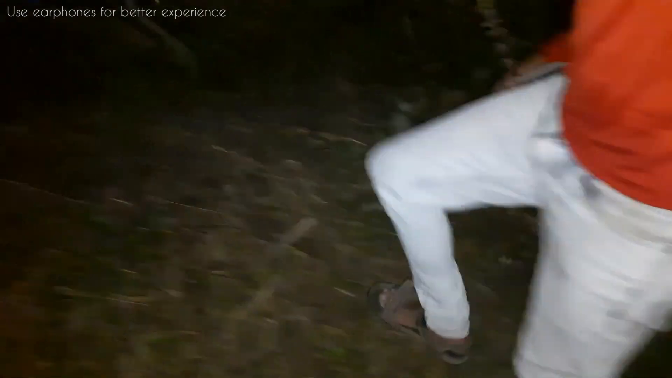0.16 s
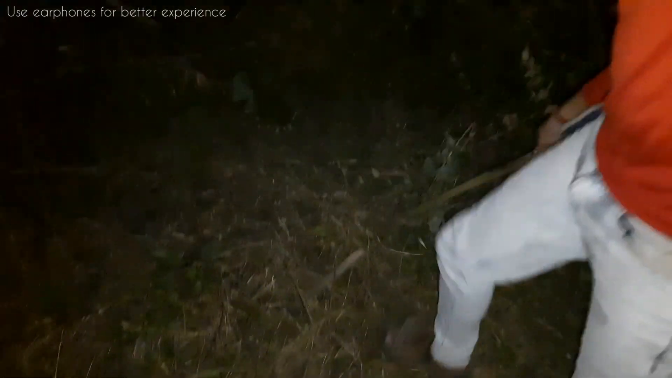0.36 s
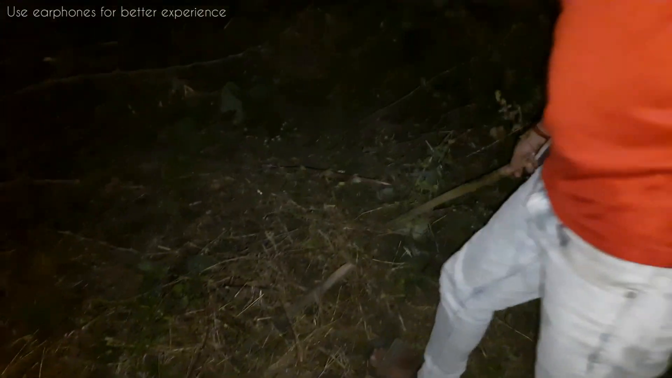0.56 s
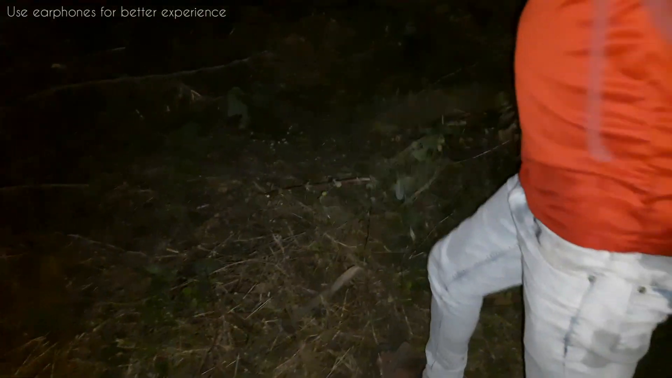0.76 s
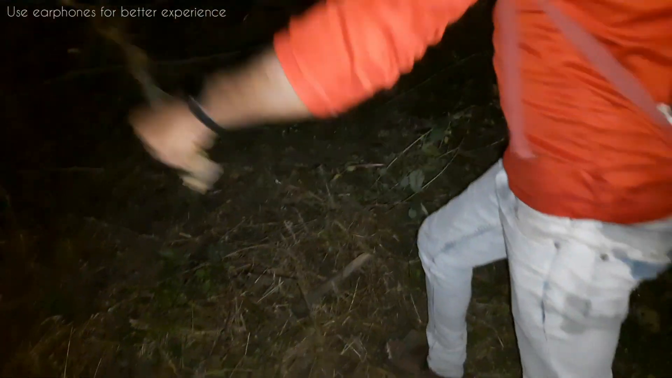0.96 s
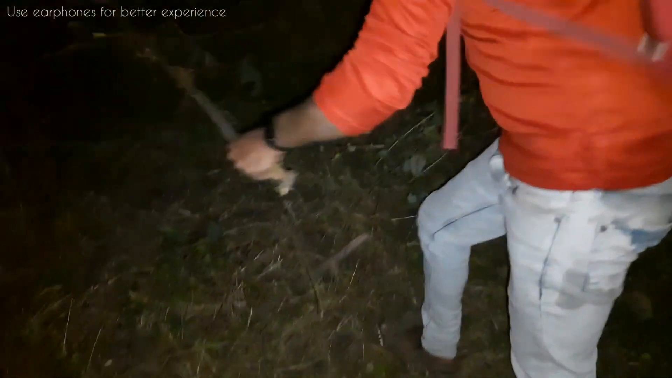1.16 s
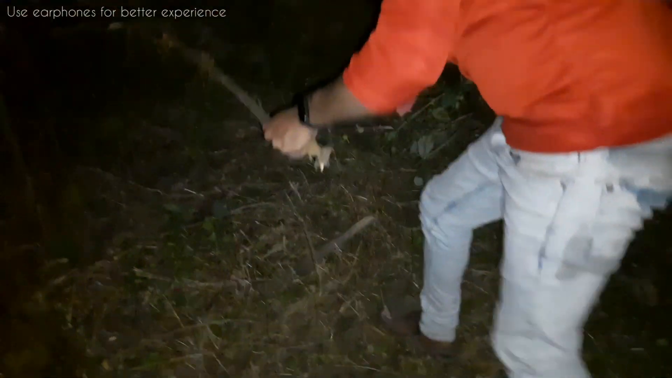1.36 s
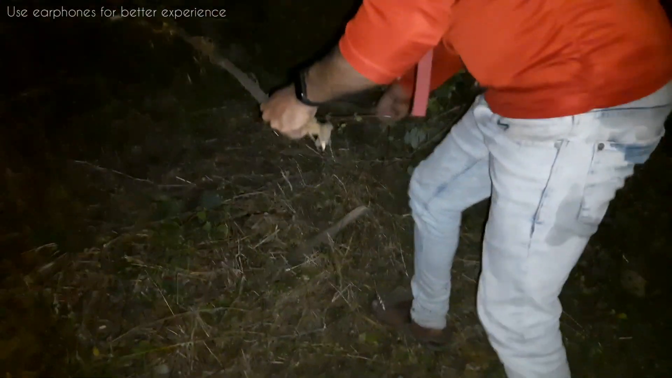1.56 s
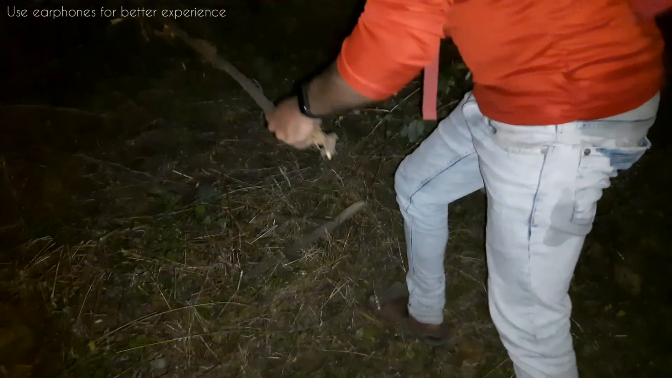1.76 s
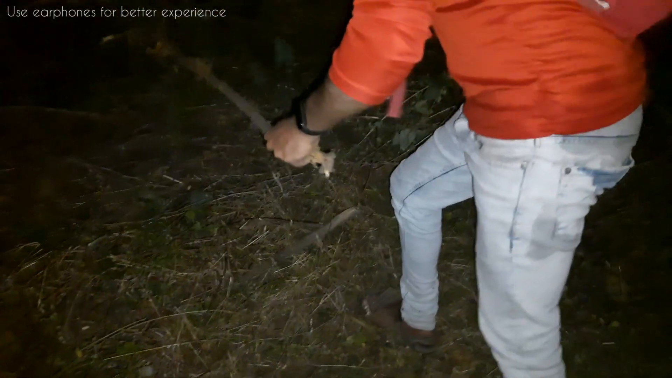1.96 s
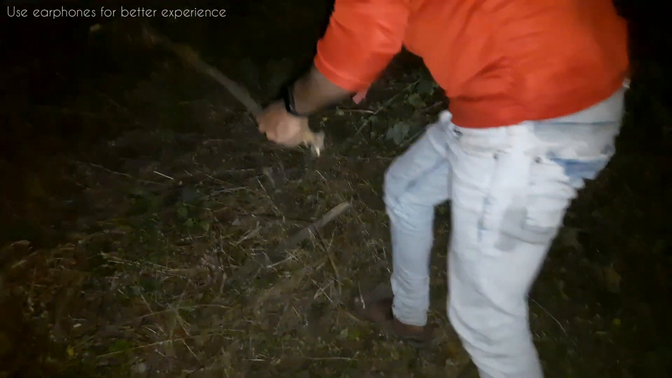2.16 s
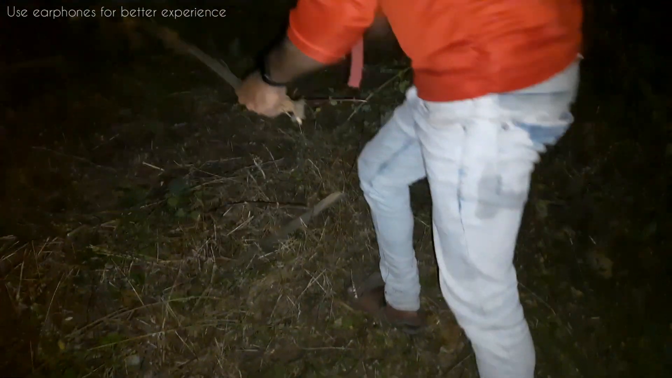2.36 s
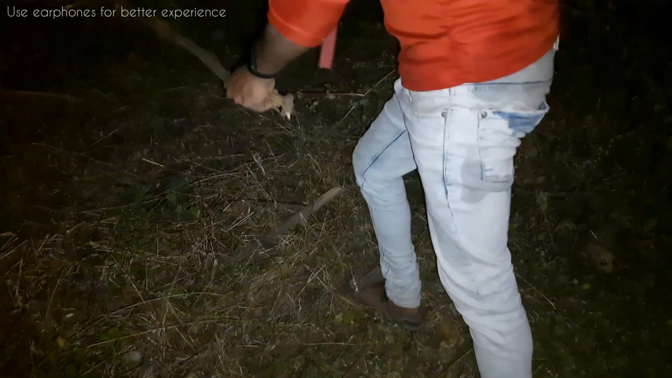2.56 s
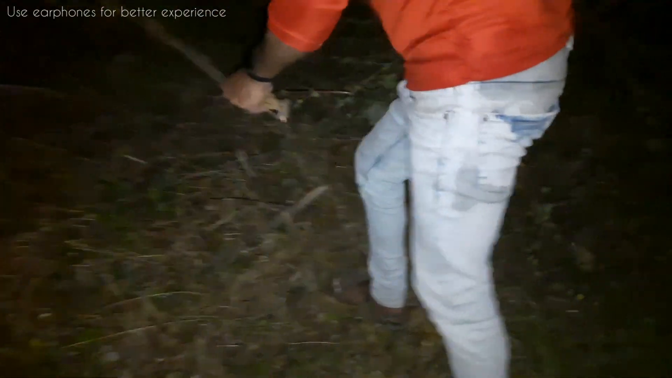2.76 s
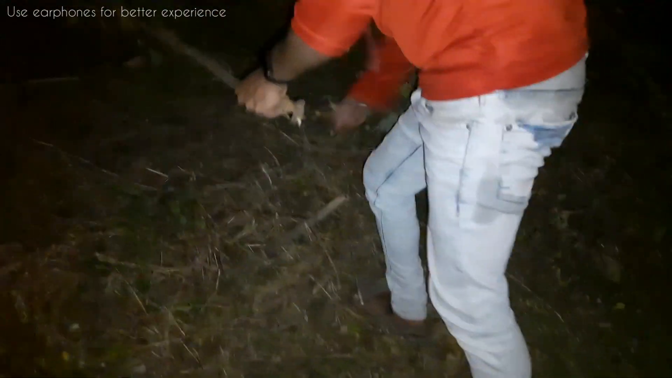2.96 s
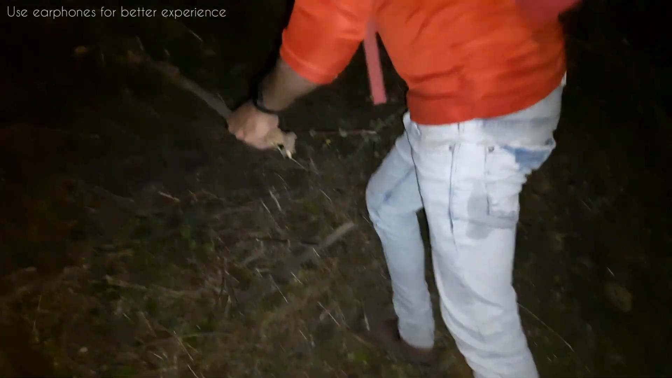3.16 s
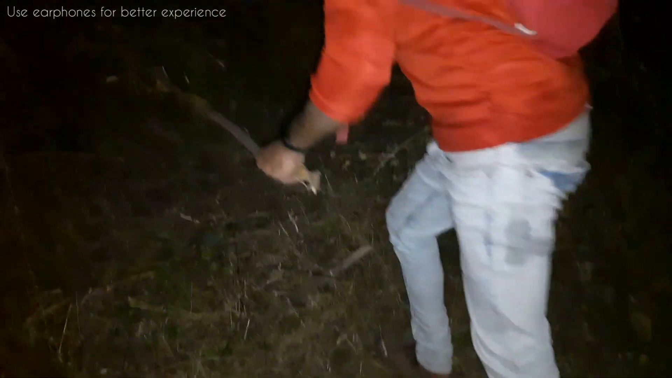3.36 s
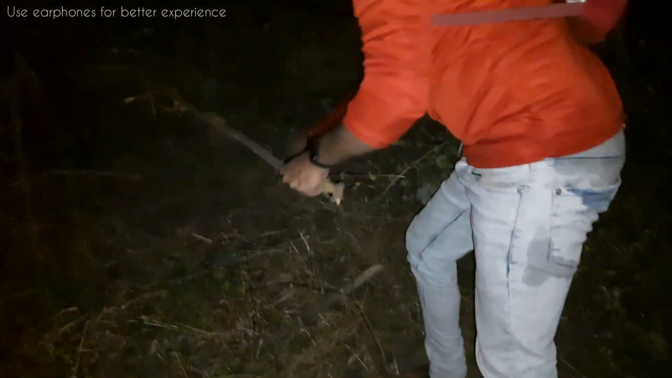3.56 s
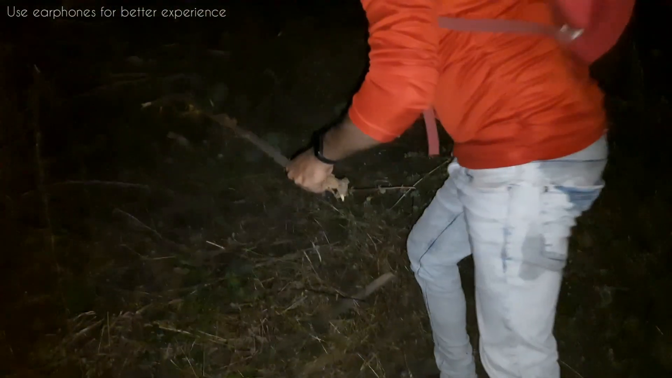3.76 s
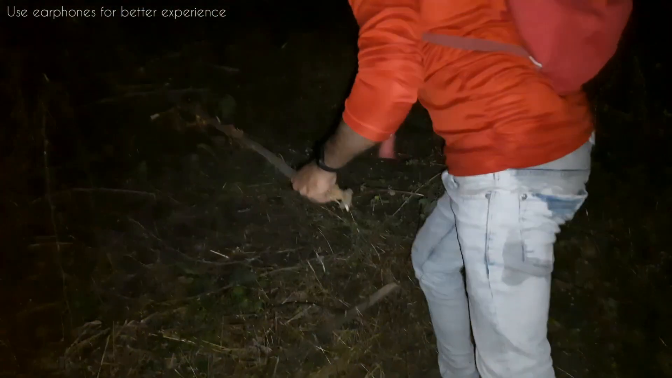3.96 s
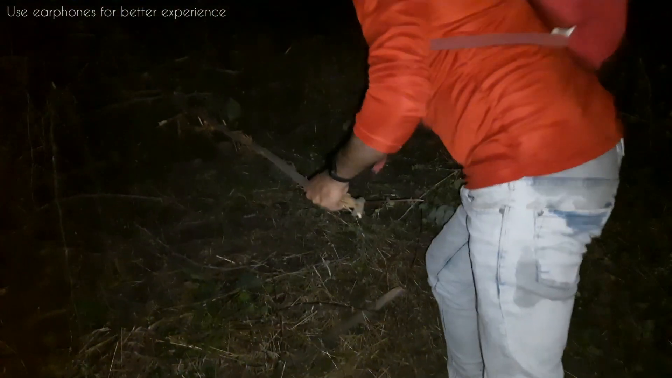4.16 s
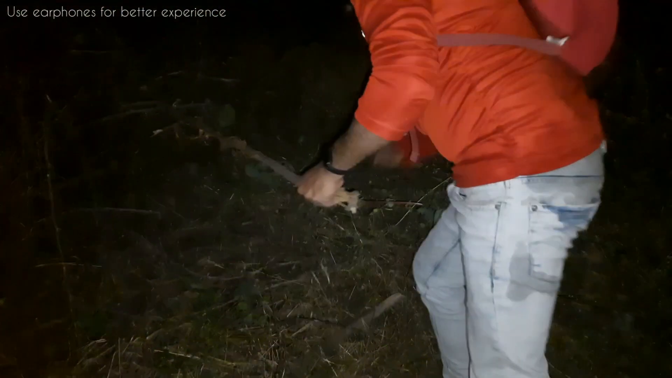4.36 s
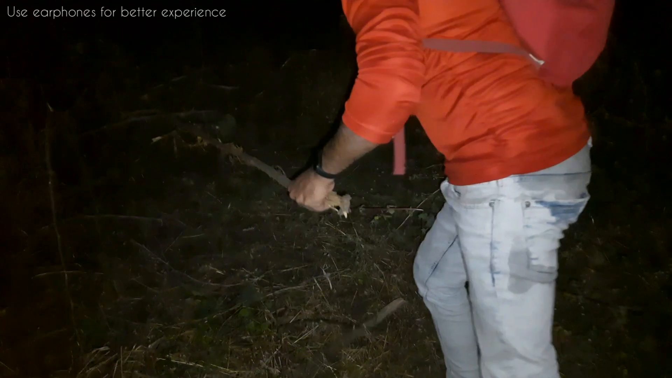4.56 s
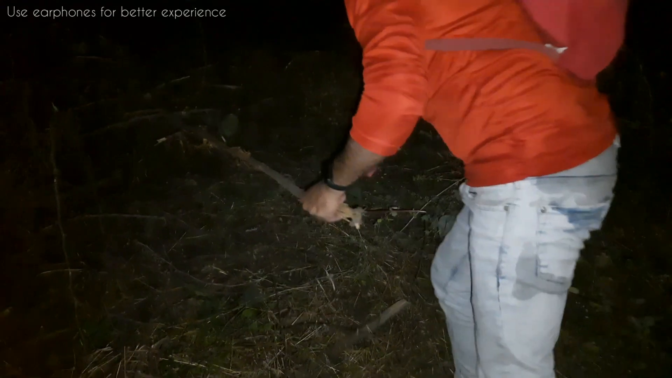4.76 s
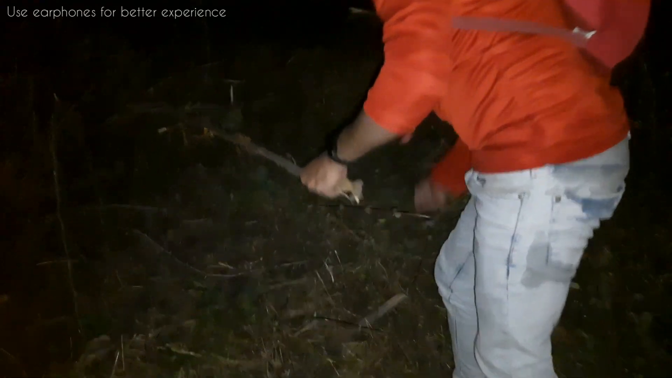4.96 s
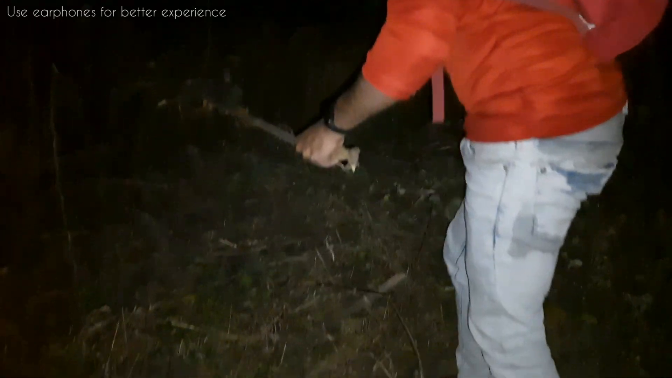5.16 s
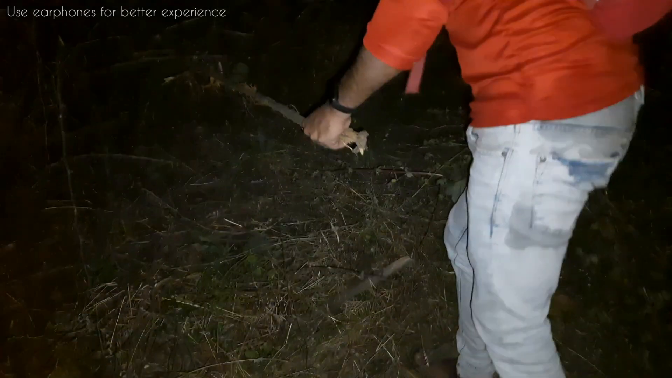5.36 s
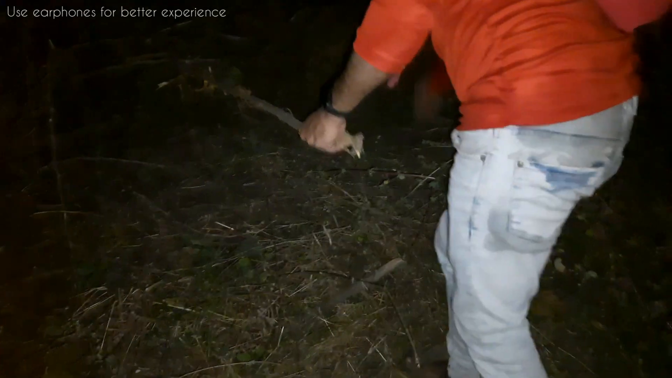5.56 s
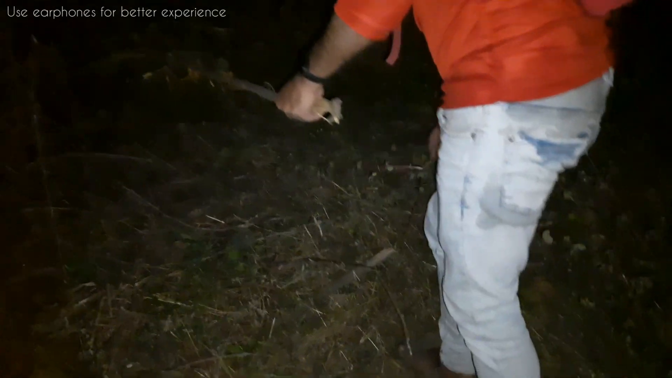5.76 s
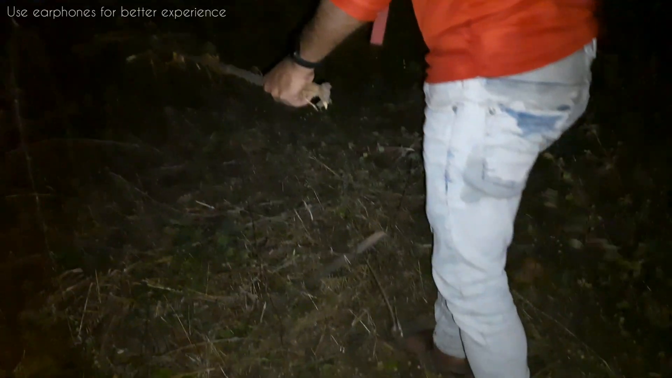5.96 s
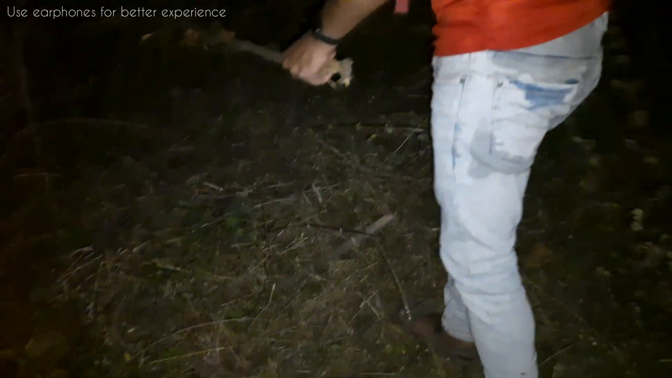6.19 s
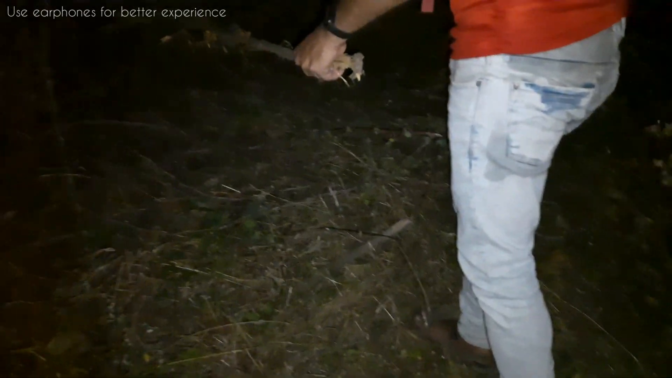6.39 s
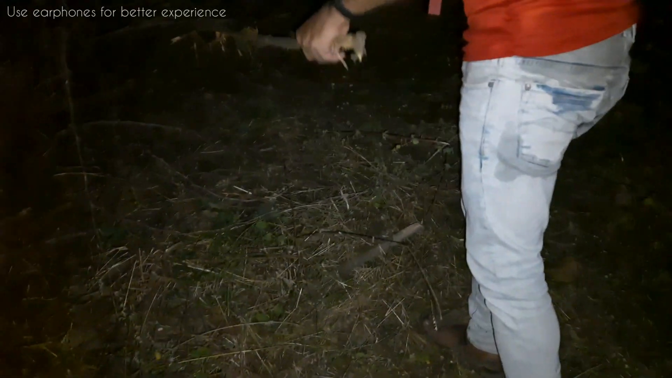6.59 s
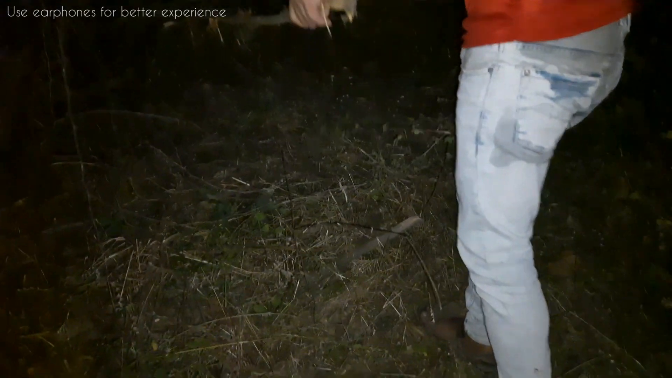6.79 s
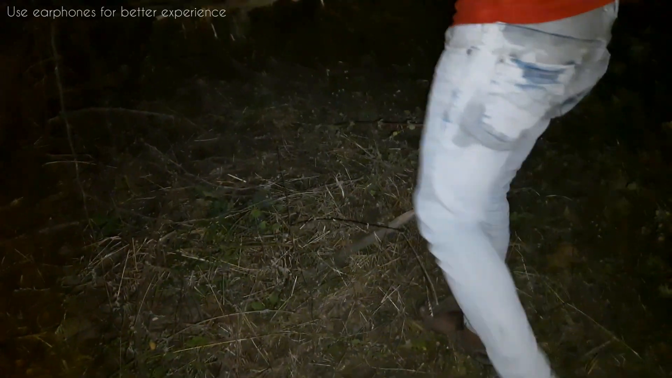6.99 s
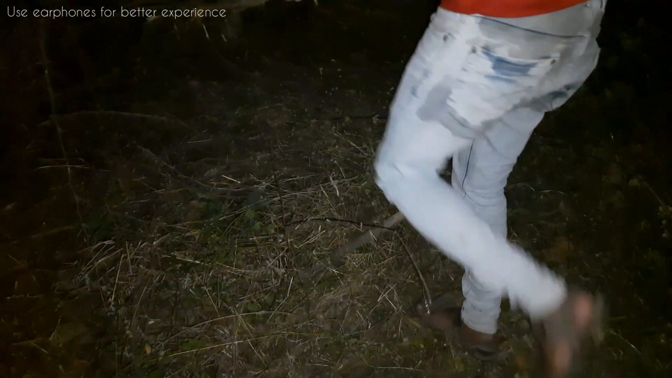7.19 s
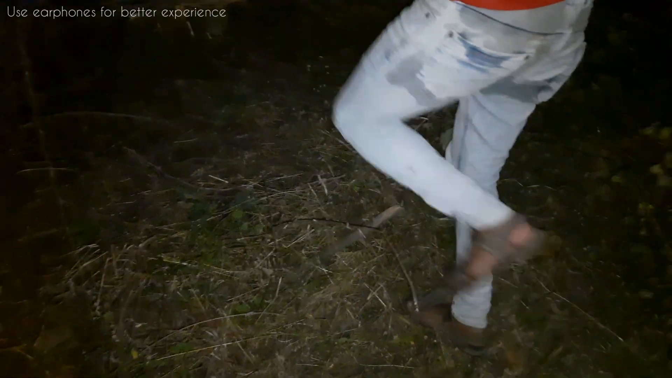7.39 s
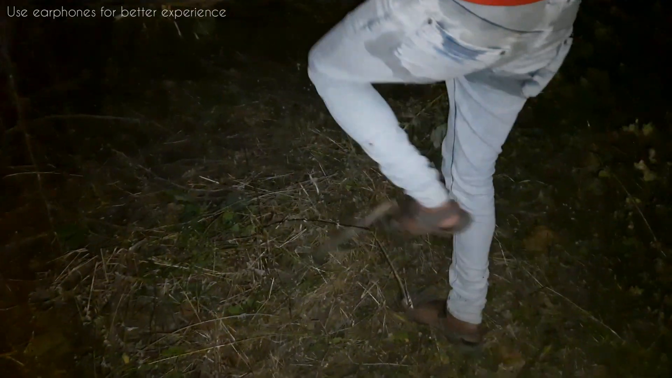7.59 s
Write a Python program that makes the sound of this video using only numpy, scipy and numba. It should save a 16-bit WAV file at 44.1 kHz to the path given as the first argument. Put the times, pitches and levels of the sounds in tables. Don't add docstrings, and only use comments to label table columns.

```python
import sys
import numpy as np
from scipy import signal
from scipy.io import wavfile
from scipy.ndimage import uniform_filter1d
from numba import njit

SR = 44100
rng = np.random.default_rng(int(sys.argv[2]) if len(sys.argv) > 2 else 0)


def file_out(sig):
    cols = np.atleast_2d(sig).T
    lim = np.clip(cols, -1, 1)
    pcm = np.round(lim * 32767).astype(np.int16)
    wavfile.write(sys.argv[1], SR, pcm)


def volts(x):
    e = np.asarray(x, float) / 20
    return 10 ** e


N = 336571
PORT_LAG_S = 0.00017


def band(x, lo_hz, hi_hz, order=2):
    y = signal.sosfilt(signal.butter(order, [lo_hz, min(hi_hz, 0.45 * SR)], "band", fs=SR, output="sos"), x)
    return y / np.sqrt(np.mean(y ** 2))


def walk(rate_hz):
    k = int(SR / rate_hz)
    held = np.repeat(rng.standard_normal(N // k + 1), k)
    return uniform_filter1d(uniform_filter1d(held, k), k)[:N]


@njit
def rings(start, hz, t60, size):
    out = np.zeros((2, N))
    for g in range(len(hz)):
        turn = np.exp(2j * np.pi * hz[g] / SR - np.log(1000.) / (t60[g] * SR))
        for c in range(2):
            z = size[c, g] + 0j
            for i in range(max(start[c, g], 0), min(start[c, g] + int(t60[g] * SR) + 2, N)):
                out[c, i] += z.real
                z *= turn
    return out


def ports(s, lag_s):
    return np.round(SR * np.array([s + lag_s / 2, s - lag_s / 2])).astype(np.int64)


# start_s [s], peak_db [dB], rise_s [s], crush_fade [dB/s], settling_db [dB under peak]
BLOWS = [
    (1.373, -23, 0.024, 250, -12.5),
    (2.2075, -23.5, 0.0025, 450, -30),
    (2.221, -22.5, 0.0086, 217, -13.5),
    (2.905, -19, 0.015, 280, -18),
    (3.578, -19.5, 0.0074, 900, -30),
    (3.592, -24.5, 0.0067, 237, -12.5),
    (4.252, -21.5, 0.021, 332, -19),
    (4.89, -22, 0.0045, 288, -16),
    (5.587, -28.5, 0.0041, 903, -32),
    (5.599, -26.5, 0.027, 325, -11),
]
# crush_db, settling_db, before_contact_db, at_rest_db [dB]
LAYERS = [
    (0.5, 3.5, -37, -63.5),
    (0, 1.5, -38, -72),
    (-11, -6, -40, -80),
    (-10, -3, -23, -87),
]


def blows(t):
    s, db, rise, fade, settle_db = (c[:, None] for c in np.transpose(BLOWS))
    hit = t >= s
    after = t - s - rise
    past = np.maximum(after, 0)
    rising_db = -5.5 * np.clip(-after / rise, 0, 1)
    crush = hit * volts(db + rising_db - fade * past) ** 2
    settling = hit * volts(db + settle_db + rising_db - 72 * past) ** 2
    nearing = ~hit * volts(db - 420 * np.abs(t - s)) ** 2
    rest = np.ones(len(t))
    return volts(LAYERS) ** 2 @ np.array([crush.sum(0), settling.sum(0), nearing.sum(0), rest])


def swells(t, rows, twigs_db):
    s, length, db, dry_db, weight_db = np.transpose(rows)
    shares_db = [db + dry_db, db, db + twigs_db - 0.42 * dry_db, db + weight_db]
    return volts(shares_db) ** 2 @ np.exp(-((t - s[:, None]) / length[:, None]) ** 2)


# start_s [s], length_s [s], level_db [dB], dryness_db [dB], ground_weight_db [dB]
STEPS = [(0.056, 0.12, -50.5, 11.5, 3), (0.15, 0.096, -60, 12, 3), (0.347, 0.023, -56.5, 4, 5.5),
         (0.456, 0.081, -47, 5.5, -3.5), (0.632, 0.12, -51.5, 9, -1.5), (0.844, 0.13, -53, 6.5, -2),
         (1.077, 0.14, -50.5, 6, 0), (1.29, 0.1, -44.5, 1.5, -1), (6.615, 0.07, -61, 7.5, 0),
         (6.965, 0.071, -57.5, 5, -6), (7.06, 0.19, -64, 8, 9.5), (7.167, 0.03, -59.5, 5, -8),
         (7.458, 0.08, -63.5, 8, 6.5), (7.63, 0.05, -63, 2, 7)]


def footsteps(t):
    return swells(t, STEPS, twigs_db=-7.5)


# start_s [s], length_s [s], level_db [dB], dryness_db [dB], ground_weight_db [dB]
STIRS = [(1.647, 0.056, -55, -30, 1), (1.84, 0.082, -51.5, 0.5, -7), (2.157, 0.12, -55.5, 1, -1),
         (2.58, 0.08, -55.5, 3, -7), (3.347, 0.43, -60.5, -5, 1), (3.52, 0.041, -70, 11, 2),
         (4.03, 0.067, -56, 0, -17), (4.194, 0.044, -58, 0, -5), (4.743, 0.059, -57.5, 0, -22),
         (4.855, 0.077, -58, 7, 1), (5.333, 0.17, -62.5, 2, 1.5), (5.96, 0.085, -72.5, 19.5, 0),
         (6.19, 0.083, -58, 3.5, -2), (6.33, 0.11, -64.5, -37, 7), (6.502, 0.089, -65.5, -32, 0)]


def stirring(t):
    return swells(t, STIRS, twigs_db=-9.5)


def crackle(count, lo_hz, hi_hz, cycles, spread_db, lumps_db, lean_db=2.5):
    when, pitch, luck = rng.random((3, count))
    lag, lean, sign = rng.standard_normal((3, count))
    hz = lo_hz * (hi_hz / lo_hz) ** pitch
    size = np.sign(sign) * volts(-spread_db * np.log(luck + 1e-4))
    size = size * volts(lean_db * np.array([lean, -lean]))
    cracks = rings(ports(when * N / SR, PORT_LAG_S * lag), hz, cycles / hz, size)
    return band(cracks, 0.85 * lo_hz, 1.17 * hi_hz, order=3) * volts(lumps_db)


def brush():
    t = np.arange(N // 32 + 2) * 32 / SR
    power = blows(t) + footsteps(t) + stirring(t)
    gains = [np.interp(np.arange(N) / SR, t, np.sqrt(p)) for p in power]
    blade_gain, stalk_gain, twig_gain, ground_gain = gains
    lumps = walk(70)
    blades = crackle(50000, 11000, 17800, cycles=5.4, spread_db=2.0, lumps_db=0.9 * lumps + 1.6 * walk(90))
    stalks = crackle(60000, 1836, 10600, cycles=1.25, spread_db=1.5, lumps_db=0.9 * lumps)
    twigs = crackle(6000, 718, 1300, cycles=6.9, spread_db=0.0, lumps_db=2.0 * lumps, lean_db=3.0)
    ground = crackle(2500, 107.5, 407, cycles=0.71, spread_db=0.5, lumps_db=-2.0, lean_db=3.2)
    hand = band(rng.standard_normal(N), 59.4, 81) * volts(np.array([[-11.5], [-12.5]]))
    out = blades * blade_gain * volts(2.5)
    out += stalks * stalk_gain * volts(2.0)
    out += twigs * twig_gain * volts(-1.5)
    out += (ground + hand) * ground_gain * volts(-5.0)
    return out


def crack_swells(rows, octaves, count=260, sudden=False):
    s, db, hz, length = (c[:, None] for c in np.transpose(rows))
    when, tune, lag, luck = np.moveaxis(rng.standard_normal((len(s), 4, count)), 1, 0)
    if sudden:
        when = 1.5 * np.abs(when) - 0.8
    spread = octaves * np.where(hz < 2000, 2.2, 1)
    pitch = np.clip(hz * 2 ** (spread * tune), 200, 16500)
    size = luck * volts(db) * np.sqrt(length * pitch / count * 7)
    size = np.array([size.ravel()] * 2)
    start = ports((s + length * when).ravel(), PORT_LAG_S * lag.ravel())
    pitch = pitch.ravel()
    t60 = 9 / pitch
    return 1.49 * (rings(start, pitch, t60, size) - rings(start, pitch, 0.31 * t60, size))


# start_s [s], level_db [dB], pitch_hz [Hz], length_s [s]
CRUNCHES = [(1.375, -16.5, 6500, 0.00098), (1.3805, -13, 13000, 0.00098), (1.387, -17.5, 12100, 0.0017),
            (1.398, -20, 8050, 0.0015), (1.4535, -22, 7900, 0.0017), (2.231, -15.5, 9100, 0.0027),
            (2.914, -30, 13000, 0.00084), (2.9255, -13.5, 9100, 0.0028), (2.932, -31, 6030, 0.00074),
            (3.584, -25, 8200, 0.0016), (3.5965, -12, 7960, 0.0014), (3.607, -16, 9000, 0.0026),
            (4.264, -10, 10800, 0.00079), (4.2695, -10.5, 8800, 0.0012), (4.896, -14, 6760, 0.0024),
            (5.5913, -14, 3900, 0.00094), (5.5938, -14, 8340, 0.0014), (5.624, -15.5, 6600, 0.00042),
            (5.635, -15.5, 9200, 0.00091)]


def crunches():
    return crack_swells(CRUNCHES, octaves=0.45)


# start_s [s], peak_db [dB], pitch_hz [Hz], left_minus_right_db [dB]
CRACKS = [(0.0267, -13.5, 13200, -0.5), (0.037, -35, 11400, 11), (0.2581, -26, 13000, 10),
          (0.9852, -25, 12300, -10), (1.0034, -20.5, 3640, -3.5), (1.123, -19, 4080, 0.5),
          (1.51, -16, 14500, 2.5), (2.207, -9.5, 8700, 4.5), (2.2206, -7, 2970, 3.5),
          (2.232, -8, 11700, 10.5), (2.241, -10, 11300, -2), (2.9056, -3, 3680, 1),
          (3.317, -27, 12100, -0.5), (3.51, -37, 7150, -9), (3.9943, -30, 5170, -6),
          (4.191, -33, 6440, 1.5), (4.2544, -5.5, 4660, 1), (4.2475, -24, 8000, 2), (4.8244, -45, 6960, -5),
          (4.8946, -4.5, 6600, 0.5), (4.8993, 1, 12500, -3), (0.209, -26, 12650, -5),
          (0.586, -27, 11000, 1), (1.265, -30, 2480, -3), (6.421, -38, 4150, 0), (7.118, -26, 11900, 6.5),
          (6.736, -38, 5530, -3), (6.242, -29, 13200, -4), (6.849, -28, 9700, -4),
          (6.938, -27, 12600, -7.5), (7.56, -26, 13000, 2.5)]
# start_s [s], peak_db [dB], pitch_hz [Hz], stem_1_4khz_db [dB], knock_below_1khz_db [dB]
STEMS = [(0.402, -32, 12300, 8, -19), (0.4655, -17, 11200, -8, -21), (0.5208, -31.5, 1960, -29, 1),
         (0.5455, -19.5, 12800, 6, -5.5), (1.005, -10.5, 11800, -12, -30), (1.085, -18.5, 12500, -1.5, -16),
         (1.125, -5, 11300, -8, -17), (1.2376, -23, 1520, -14, -6), (1.251, -8, 11800, -7, -27),
         (1.282, -23.5, 12100, 7, -5), (2.1142, -39, 1730, -15, -28), (2.35, -12, 12200, 3, -1.5),
         (2.438, -21, 11900, -7, -29), (3.554, -36.5, 7200, 7, -3), (4.172, -33, 6000, -15, -28),
         (4.2043, -35, 2400, -8, -20), (4.22, -36, 2300, -6, -18), (4.712, -28, 2390, -20, -41),
         (4.8546, -44, 5190, 16, -22), (1.034, -30.5, 6030, 2, -2.5), (5.8658, -23, 12300, -5, -42),
         (6.4298, -31.5, 7300, 5, -13.5), (6.9636, -31.5, 6850, -18, -5)]


def snaps(count=8):
    rows = [(s, db, hz, -35, -41, pan) for s, db, hz, pan in CRACKS]
    rows += [(*row, -1) for row in STEMS]
    s, peak_db, hz, stem_db, knock_db, pan_db = (c[:, None] for c in np.transpose(rows))
    chance = rng.standard_normal((len(s), 3, 2 * count + 3))
    ladder = np.linspace(0, 1, count) + 0 * s
    thin = np.arange(len(s))[:, None] < len(CRACKS)
    lowest = hz * np.where(thin, 0.82, np.where(hz < 5000, 0.72, 0.6))
    splinters = lowest * (np.minimum(1.63 * hz, 15500) / lowest) ** ladder
    stem = 1500 * 3.11 ** ladder
    pitch = np.hstack([hz, splinters, stem, 400 + 0 * s, 850 + 0 * s]) * 2 ** (0.13 * chance[:, 0])
    parts_db = [0 * s - 8, 0 * ladder - 9, stem_db - 19 + 0 * ladder, knock_db - 3, knock_db - 5]
    db = peak_db + np.hstack(parts_db)
    ring = np.clip(28 / pitch, 0.004, 0.013)
    trailing = (pitch > 3000) * (np.arange(pitch.shape[1]) % 3 > 0)
    late = 0.001 * np.minimum(chance[:, 1] ** 2, 3) * trailing
    size = volts(db - 270 * late) * np.sign(chance[:, 2]) * volts(np.array([pan_db, -pan_db]) / 2)
    size = size.reshape(2, -1)
    lag = -0.00002 * pan_db + 0.5 * PORT_LAG_S * chance[:, 2] * (pitch > 1000)
    start = ports((s + late).ravel(), lag.ravel())
    pitch, ring = pitch.ravel(), ring.ravel()
    soft = rings(start, pitch, 0.092 * ring, size * (pitch < 5000))
    return 0.99 * (rings(start, pitch, ring, size) - soft)


# start_s [s, the blow], swish_db [dB], top_pitch_hz [Hz]
SWINGS = [
    (1.371, -33.5, 231),
    (2.205, -40.5, 192),
    (2.908, -41.5, 187),
    (3.579, -39, 202),
    (4.25, -47, 202),
    (4.891, -47, 202),
    (5.589, -52, 200),
]
# start_s [s], peak_db [dB], pitch_hz [Hz], swell_s [s]
THUDS = [(1.385, -50, 150, .006), (2.226, -42, 137, 0.0048), (2.92, -38.5, 318, 0.013),
         (3.596, -40, 151, 0.0057), (3.62, -43, 138, 0.006), (4.261, -42, 142, .006),
         (4.896, -35, 151, 0.0065), (5.613, -45, 125, 0.0056), (6.959, -42.5, 486, 0.0044),
         (7.07, -48, 134, 0.012), (7.509, -55.5, 95.5, 0.017)]


def stick():
    t, out = np.arange(N) / SR, np.zeros(N)
    wobble, flutter_db = walk(130), 3.5 * walk(120)
    lead_s = 0.0116
    for s, swish_db, top_hz in SWINGS:
        speed = np.exp(np.minimum(t - s + lead_s, 0) / 0.063)
        turn = 2 * np.pi * np.cumsum(top_hz * speed * (1 + 0.19 * wobble)) / SR
        stop = np.clip((s + 0.004 - t) / lead_s, 0, 1)
        out += volts(swish_db + flutter_db) * speed ** 3.5 * stop * np.sin(turn)
    for s, db, hz, swell in THUDS:
        after = np.maximum(t - s, 0)
        envelope = after / swell * np.exp(1 - after / swell)
        out += volts(db) * envelope * np.sin(2 * np.pi * hz * after / (1 + 9.9 * after))
    return out


# start_s [s], level_db [dB], pitch_hz [Hz], length_s [s]
RUSTLES = [(0.034, -47, 13500, 0.0041), (0.0745, -33, 12900, 0.00099), (0.112, -32, 13900, 0.0076),
           (0.223, -63, 12900, 0.0073), (0.26, -59, 13000, 0.0031), (0.463, -56, 1630, 0.039),
           (0.53, -49.5, 1300, 0.029), (0.657, -41.5, 9800, 0.018), (1.37, -23.5, 8000, 0.0048),
           (4.88, -33, 5860, 0.0065), (4.884, -34.5, 12500, 0.009), (6.286, -43, 14400, 0.013),
           (6.4, -60, 14200, 0.044), (6.029, -47, 12100, 0.0091), (6.968, -56, 890, 0.012),
           (5.323, -47, 11000, 0.0088), (7.131, -41, 10600, 0.017), (7.571, -54, 13000, 0.0054),
           (7.625, -65, 9000, 0.005)]


def rustles():
    return crack_swells(RUSTLES, octaves=0.21)


# start_s [s], level_db [dB], pitch_hz [Hz], length_s [s]
TICKS = [(0.0315, -41, 13000, 0.00057), (0.0377, -35, 11900, 0.0028), (0.0745, -41, 13000, 0.0012),
         (0.1144, -28, 13100, 0.0012), (0.2584, -50, 13100, 0.0017), (0.4519, -34, 11600, 0.0015),
         (0.6555, -38, 10700, 0.0013), (0.6975, -34, 10600, 0.00097), (0.7306, -41, 5700, 0.00088),
         (0.7468, -38, 10400, 0.0022), (0.7606, -45, 13500, 0.0016), (0.8635, -34, 11700, 0.00069),
         (0.8714, -30.5, 10200, 0.00092), (1.0334, -31, 7800, 0.0011), (1.0482, -43, 9200, 0.0008),
         (1.2465, -28, 9300, 0.00089), (1.2955, -42, 7400, 0.0009), (1.3868, -21, 10400, 0.0012),
         (1.711, -40, 13200, 0.0013), (2.1932, -48, 12000, 0.001), (2.2217, -22, 3270, 0.00042),
         (2.3453, -29, 11700, 0.0011), (2.8644, -41, 13000, 0.0016), (2.8907, -39, 10600, 0.0012),
         (3.2148, -44, 7700, 0.0016), (3.4755, -44, 12000, 0.0012), (3.5119, -43, 12100, 0.0008),
         (3.9942, -55, 5400, 0.0012), (4.3912, -41, 4400, 0.0008), (4.7122, -44.5, 2290, 0.0014),
         (4.8266, -43, 11300, 0.0011), (4.9962, -36, 13500, 0.0009), (5.0698, -40, 9700, 0.0025),
         (5.1502, -43, 7500, 0.0019), (5.3239, -48, 9100, 0.0011), (5.7566, -32, 9100, 0.00077),
         (5.8027, -38, 9200, 0.0014), (5.8123, -35, 5800, 0.0013), (5.9092, -48, 7800, 0.0021),
         (6.1554, -43, 11000, 0.0013), (6.2529, -42, 13300, 0.0013), (6.2955, -52, 13300, 0.0018),
         (6.4305, -44, 8650, 0.0016), (6.6979, -42, 10700, 0.0015), (6.8585, -46, 9000, 0.001),
         (6.9605, -43, 8100, 0.0011), (7.124, -36, 12000, 0.0015), (7.1324, -46, 12400, 0.0011),
         (7.5743, -44, 11800, 0.0014), (7.6297, -37, 7600, 0.0011)]


def ticks():
    return crack_swells(TICKS, octaves=0.4, count=60, sudden=True)


# start_s [s], hold_s [s], top_pitch_hz [Hz], level_db [dB], half_pitch_db [dB below]
PLANTING = [
    (.81, 0.045, 2690, -51.5, -27),
    (1.18, 0.0074, 2600, -54, -20),
]
# start_s [s], hold_s [s], top_pitch_hz [Hz], level_db [dB], half_pitch_db [dB below]
LIFTING = [
    (7.122, 0.034, 2435, -62, -4.5),
    (7.352, 0.055, 2695, -55, -32),
    (7.476, 0.0137, 2585, -53.5, -11),
]


def sandal():
    t, out = np.arange(N) / SR, np.zeros(N)
    shake, tremble = walk(500), walk(200)
    slide_s, tail_s = 0.0343, 0.035
    for squeaks, octave_db in ((PLANTING, -18), (LIFTING, -3)):
        for s, hold, hz, db, half_db in squeaks:
            slid = np.clip((t - s - hold) / slide_s, 0, 1)
            grip = 1 - 0.038 * np.exp(-np.maximum(t - s, 0) / 0.0178) - 0.14 * slid
            turn = 2 * np.pi * np.cumsum(hz * grip * (1 + (0.012 + 0.04 * slid) * shake)) / SR
            end = s + hold + slide_s + tail_s
            fade = np.clip(np.minimum((t - s) / 0.014, (end - t) / 0.039), 0, 1)
            fade = fade * volts(db - 7.5 * slid ** 3) * volts((3 + 4 * slid) * tremble)
            half = volts(half_db) * (np.sin(turn / 2) + np.sin(3 * turn / 2))
            octave = volts(octave_db - 18 * slid ** 2) * np.sin(2 * turn)
            out += np.sqrt(2) * fade * (np.sin(turn) + octave + half)
    return out * volts(np.array([[1.5], [-1.5]]))


# start_s [s], level_db [dB], left_minus_right_db [dB]
KATYDID = [
    (0.0, -47, -8),
    (0.27, -48, -5),
    (1.36, -46.5, -7),
    (1.64, -54.5, -7),
    (5.61, -54.5, -9.5),
    (5.739, -50.5, -8),
    (6.5, -55, -7),
    (7.29, -48.5, -6.5),
    (7.63, -49, -4),
]
# pitch_hz [Hz], width_hz [Hz], level_db [dB], stroke_rate [strokes/s]
KATYDID_WINGS = [
    (6595, 1000, -3.5, 51),
    (7060, 810, 0.5, 53),
    (7100, 2900, -5.5, 190),
]


def katydids():
    t = np.arange(N) / SR
    buzz = 0
    for hz, width_hz, db, rate in KATYDID_WINGS:
        stroke = np.cumsum(rate * (1 + 0.0215 * walk(2.5))) / SR % 1
        gate = 0.3 + np.exp(-((stroke - 0.5) / 0.37) ** 2)
        rasp = band(rng.standard_normal((2, N)), hz - width_hz / 2, hz + width_hz / 2, order=3)
        buzz = buzz + volts(db + 0.5 * walk(15.0)) * gate * rasp
    s, db, pan_db = np.transpose(KATYDID)
    lean_db = np.interp(t, s, pan_db) * np.array([[0.5], [-0.5]])
    return volts(np.interp(t, s, db) - 2.45 + lean_db) * buzz


# start_s [s, last quick pulse], level_db [dB], quick_pulses [count], slow_pulses [count]
CHIRPS = [(0.255, -57.5, 5, 3.6), (0.905, -57, 4, 3), (2.071, -73, 4, 3), (2.733, -68, 8, 3.6),
          (3.38, -80, 5, 2), (4.045, -74, 4.5, 3.3), (4.71, -76, 4, 2.6), (5.359, -68, 6, 3),
          (6.065, -64, 7, 3), (6.73, -66.5, 5, 3.3), (7.371, -60.5, 6, 5.1)]


def cricket():
    t = np.arange(N) / SR
    song, glide = np.zeros(N), np.zeros(N)
    for s, db, quick, slow in CHIRPS:
        gap = np.where(t < s, 0.025, 0.0355)
        beat = np.round((t - s) / gap)
        on = (beat > -round(quick)) * (beat <= round(slow))
        stroke = np.clip((t - s - beat * gap) / 0.027, -0.5, 0.5)
        song += on * volts(db + 0.4 * np.clip(beat, -9, 2)) * np.cos(np.pi * stroke)
        glide -= on * 0.0804 * stroke
    turn = 2 * np.pi * np.cumsum(4050 * (1 + glide + 0.025 * walk(300))) / SR
    near = 1.9 * song * volts(4.5 * walk(220)) * np.sin(turn + np.array([[0.6], [-0.6]]))
    far = volts(-65.5 + 4.4 * walk(10)) * band(rng.standard_normal((2, N)), 3500, 4540)
    return near + far


# pitch_hz [Hz], level_db [dB per Hz]
NIGHT_SPECTRUM = [(24, -39), (40, 17.5), (290, 10.5), (570, 6.5), (810, -54), (1340, 0.5), (2500, 3),
                  (3060, -17), (3930, -29), (5440, -32.5), (7000, 61.5), (7930, -8), (13400, 3.5),
                  (16000, 4.5)]


def night():
    out = 0
    hz_at, db_at = np.transpose(NIGHT_SPECTRUM)
    for hz in 30 * 2 ** np.arange(0, 9.2, 1 / 3):
        air = rng.standard_normal((3, N))
        apart = np.clip(hz / 1200, 0.12, 3)
        db = np.interp(np.log(hz), np.log(hz_at), db_at) + 10 * np.log10(hz) + 2 * walk(9)
        lean = volts(min(40 / hz, 1.5) * (hz < 150) * np.array([[1], [-1]]))
        noise = band(air[0] + apart * air[1:], hz / 2 ** (1 / 6), hz * 2 ** (1 / 6))
        out = out + volts(db) * lean * noise
    return out * volts(-59) / np.sqrt(np.mean(out ** 2))


def scene():
    struck = brush() + crunches() + snaps() + stick()
    handled = rustles() + ticks() + sandal()
    return struck + handled + katydids() + cricket() + night()


def top_cut(x):
    return signal.sosfilt(signal.butter(12, 16810, fs=SR, output="sos"), x)


def record(dry):
    treble = signal.sosfilt(signal.butter(1, 7000, "high", fs=SR, output="sos"), dry)
    loud = 0.9 * np.tanh((dry + 0.22 * np.array([[1], [-1]]) * treble) / 0.9)
    bend = signal.sosfilt(signal.butter(2, [50, 177], "band", fs=SR, output="sos"), loud ** 2)
    bent = loud + volts(-5) * bend * np.array([[1], [0.1]])
    cut = signal.sosfiltfilt(signal.ellip(8, 0.1, 60, 15800, fs=SR, output="sos"), bent)
    return top_cut(cut)


dry = scene()
out = record(dry)
file_out(out)
```